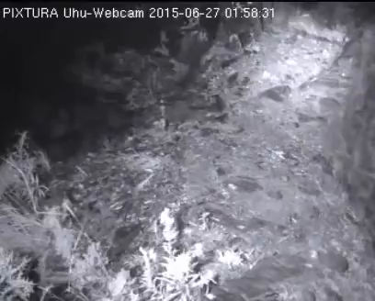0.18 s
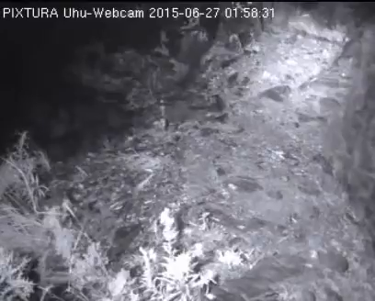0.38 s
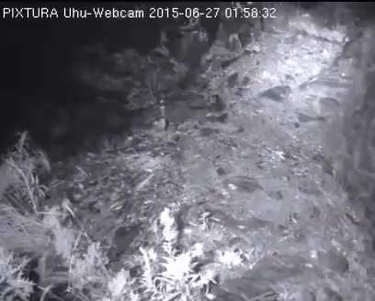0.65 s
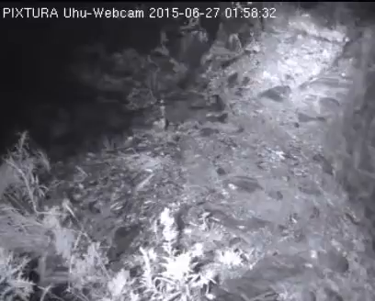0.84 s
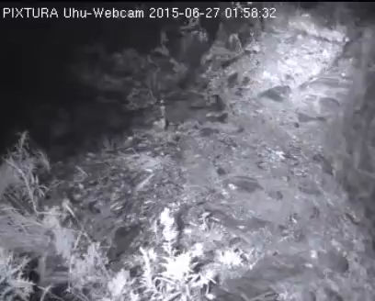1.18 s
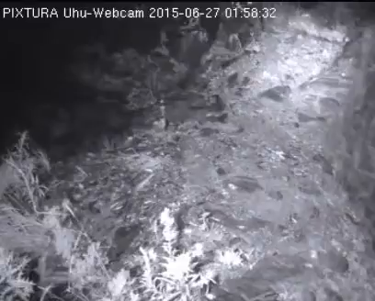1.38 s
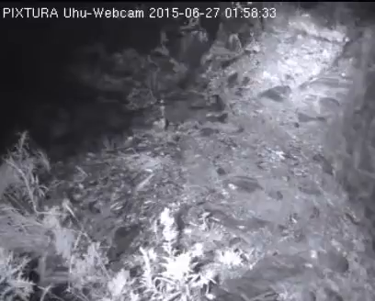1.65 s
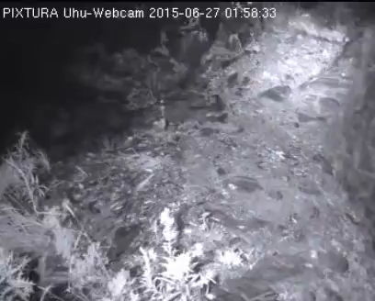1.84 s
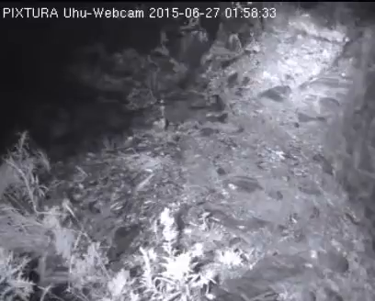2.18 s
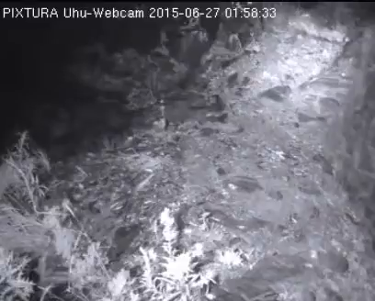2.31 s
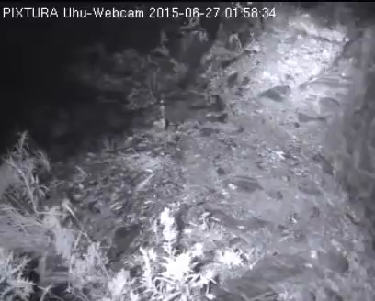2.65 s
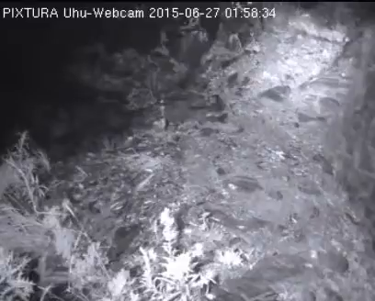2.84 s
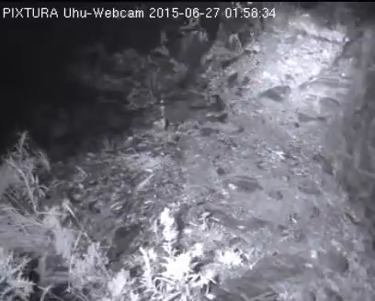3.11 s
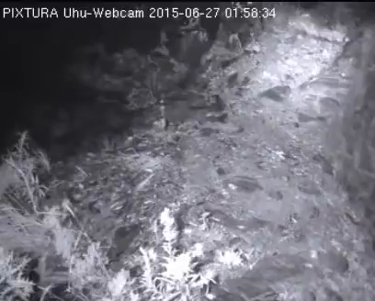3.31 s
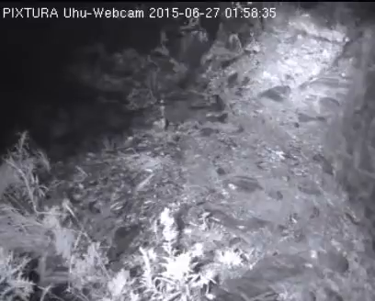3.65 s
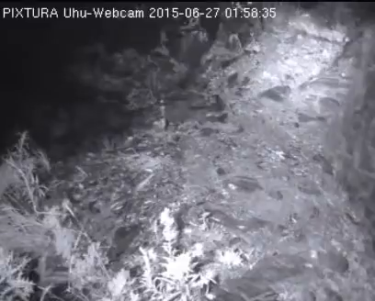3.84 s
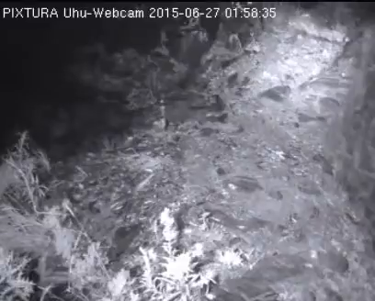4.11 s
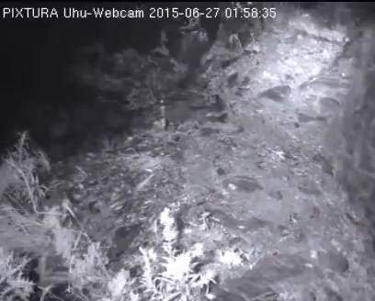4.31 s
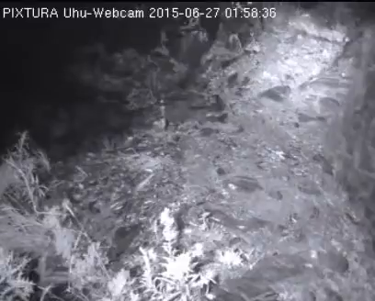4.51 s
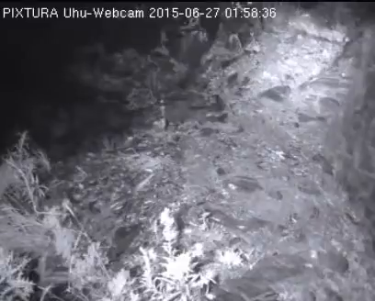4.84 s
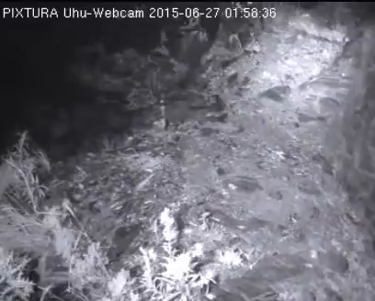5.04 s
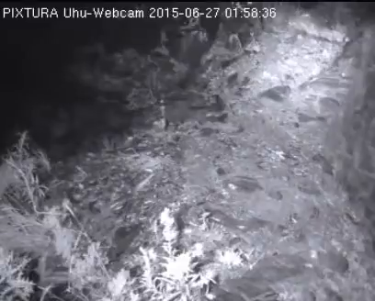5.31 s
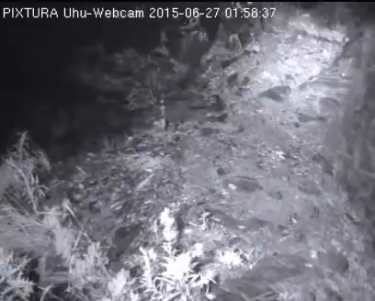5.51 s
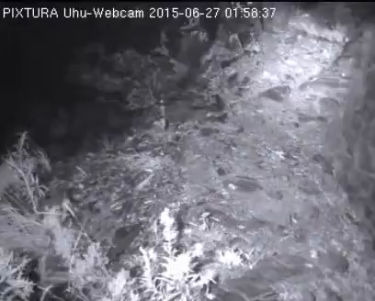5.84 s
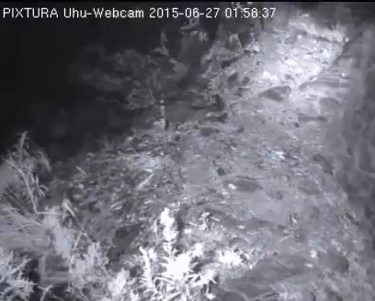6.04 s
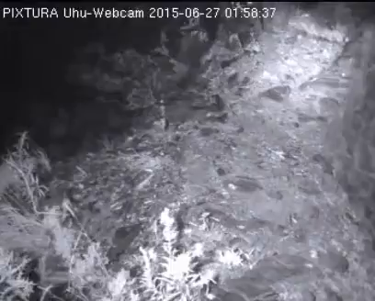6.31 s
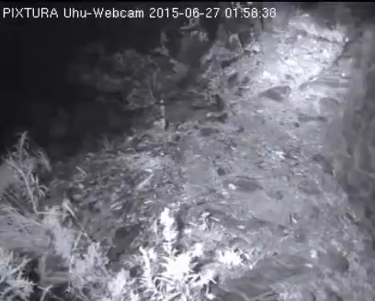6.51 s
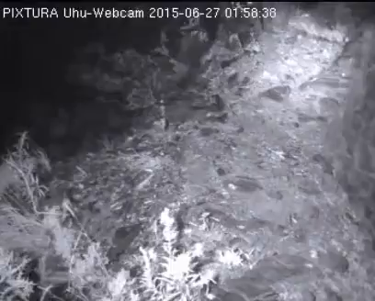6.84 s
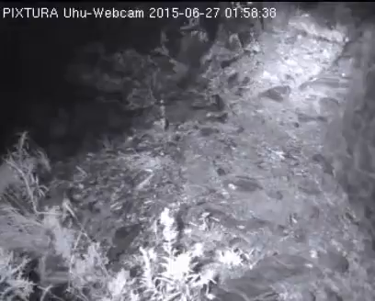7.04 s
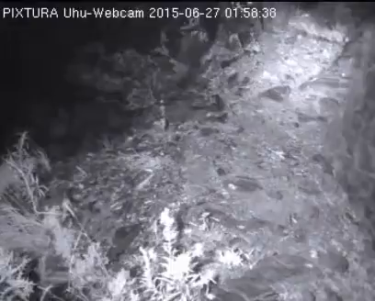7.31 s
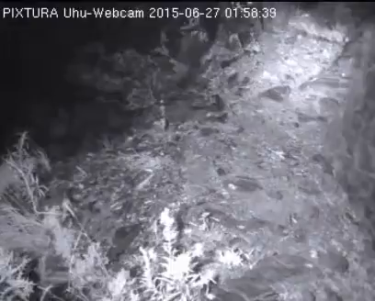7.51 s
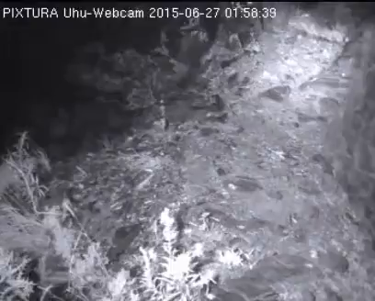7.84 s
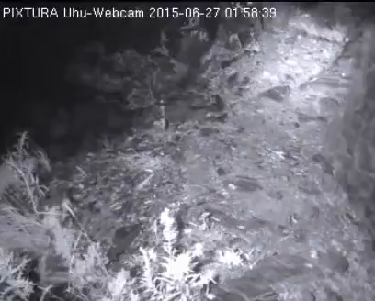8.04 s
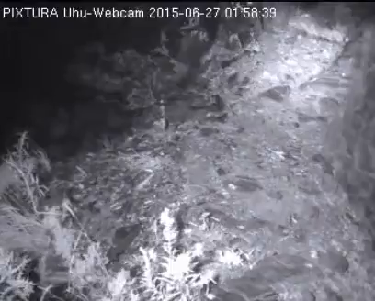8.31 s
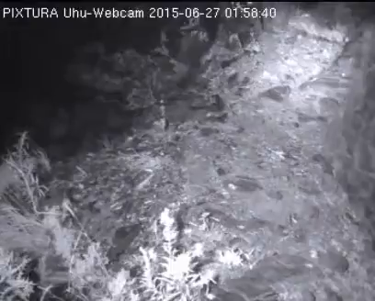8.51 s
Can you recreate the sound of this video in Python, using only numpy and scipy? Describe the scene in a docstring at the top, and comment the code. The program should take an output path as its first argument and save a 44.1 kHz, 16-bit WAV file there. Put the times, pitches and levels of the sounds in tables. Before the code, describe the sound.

A quiet night outdoors on a rocky ledge, heard in mono through a narrow, dull camera microphone. A steady, barely swaying hiss and a low electrical hum continue throughout. At about 2.5 seconds a young owl gives a hoarse, breathy rasp, swelling quickly and dying away within roughly a third of a second, with thin whistles and an unsteady, rough voice around two to four kilohertz. Near rock colours it and a faint tail returns from far slopes. At 3.8 seconds a similar, slightly softer rasp rises and ends near 4.0 in a tiny falling squeak. Only hiss and hum follow, apart from a small dry tick at 5.6. At 7.6 seconds comes the third rasp, much louder, harsher and airier, its peaks slightly clipped, stopping quickly with a very faint downward squeak near 7.9. The hiss and hum then carry on to the end, about 8.6 seconds.

```python
"""Young eagle owls begging at night

Three short hoarse rasps from a rock ledge, the last the loudest; faint squeaks trail the second and third.
Each call is breath noise coloured by a half-open throat, with narrow whistles and a thin unsteady voice.
Near rock returns quick reflections and far slopes a faint tail; one small dry tick falls between the calls.
A narrow camera microphone adds mains hum and hiss and passes little treble; later the loudest call is clipped.
"""
import sys
import numpy as np
from scipy import signal
from scipy.fft import rfft, irfft
from scipy.io import wavfile

SR = 44100
rng = np.random.default_rng(int(sys.argv[2]) if len(sys.argv) > 2 else 0)


def generate_wav(signal):
    """Clip the signal to [-1, 1] and save it as 16-bit WAV at the path in sys.argv[1]."""
    frames = np.transpose(np.atleast_2d(signal))
    scaled = np.clip(frames, -1, 1) * 32767
    pcm = np.round(scaled).astype(np.int16)
    wavfile.write(sys.argv[1], SR, pcm)


N = 382788
TIME = np.arange(N) / SR
FREQS = np.maximum(np.arange(N // 2 + 1) * SR / N, 1)

# begging calls: (start [s], hold [s], crescendo in the hold [dB/s], release [dB/s], level [dB],
# pitch at mid-hold [Hz], pitch rise in the hold [Hz/s], voice [dB], whistles [dB], far echo [dB]);
# voice and whistles are relative to the rasp, the echo to the call before the slopes thin and dull it
BEG_CALLS = [(2.457, 0.061, 12, 187, -18, 1035, -60.5, -7.5, 0, -13),
             (3.794, .038, 64, 187, -20, 977, 1500, -7.5, 2, -26),
             (7.638, .064, -13, 304, -10, 1033, 119.5, -14.5, 0, -26.5)]
# broad throat colour, one list per call: (frequency [Hz], gain [dB])
THROAT_COLOURS = [
    [(710, -64), (1200, -25), (1430, -16), (1990, -10), (2050, -11.5), (2370, 3.5), (2580, -2), (2850, 0),
     (3460, -4.5), (3790, -3.5), (4350, -13), (7500, -31), (9750, -57), (16500, -120)],
    [(700, -51), (1200, -22), (1620, -17.5), (1850, -3.5), (2250, 1), (2700, 0.5), (3150, 3), (3650, -2.5),
     (4250, -4.5), (4600, -11.5), (5200, -13), (6000, -24), (7500, -26), (9500, -56)],
    [(710, -60), (1200, -33), (1330, -21), (1800, -9.5), (2220, -16), (2450, -2), (2970, -2.5), (3700, 0.5),
     (4660, -13.5), (5310, -12), (6580, -24.5), (7500, -23), (9750, -54), (16500, -120)],
]
# narrow whistling resonances, one list per call: (frequency [Hz], pitch wander [Hz], relative level [dB])
WHISTLE_RESONANCES = [
    [(2110, 20, -8), (2200, 30, -2.5), (2300, 29, -0.5), (2470, 24.4, -5), (2786, 25, 0.5), (3090, 50, -3),
     (3670, 21, 0), (4770, 80, -11.5)],
    [(2210, 32, 1.5), (3060, 36, -12), (3330, 43, -14)],
    [(2443, 60, -3), (2717, 46.5, -8.5), (3180, 49.7, -6), (3446, 35.2, 5.5), (3710, 69.4, 0.5),
     (3820, 60, 0.5), (4060, 54, -6), (4220, 60, -8.5), (5160, 25, -12), (5440, 23, -21)],
]
# faint falling squeaks as a call dies: (middle [s], pitch there [Hz], peak envelope level [dB])
DYING_SQUEAKS = [(4.028, 2500, -34.5), (7.878, 1950, -38)]
# small tick on the ledge: (time [s], starting level [dB])
LEDGE_TICKS = [(5.616, -28)]
# mains hum: (frequency [Hz], rms level [dB])
MAINS_HUM = [(50, -45.5), (150, -33.5), (250, -52.5), (350, -51), (650, -53.5)]
# spectrum of the steady hiss: (frequency [Hz], relative density [dB])
HISS_COLOUR = [(25, -39), (40, -22), (60, -5.5), (76, -2.5), (95, 1), (125, -7), (170, -1), (270, -4),
               (400, 1.5), (1000, -3), (1500, -3.5), (2100, -5.5), (3800, -10), (7500, -12)]
# faint narrow bands in the hiss: (frequency [Hz], width [Hz], rms level [dB])
HISS_BANDS = [(63.1, 2.2, -53.5), (171.6, 5.6, -50), (1842, 76, -49.5), (1004, 81, -50)]
# treble of the camera's microphone channel: (frequency [Hz], gain [dB])
MICROPHONE_TREBLE = [(7300, 0.5), (8000, -7), (8600, -14), (9100, -24), (9800, -61.5)]
# treble after the later clipping: (frequency [Hz], gain [dB])
FINISHED_TREBLE = [(7500, 0.5), (10900, -7), (11900, -18.5), (15000, -10)]

ATTACK_S = 0.0813  # every call swells in the same time
VOICE_LAG_S = 0.006  # the voice catches a moment after the air starts to flow
# as the push weakens, the pitch sags and the voice loses this much more than the rasp
SAG_HZ_PER_DB, VOICE_EXTRA_DB_PER_DB = 0.85, 1.8
FUNDAMENTAL_DB = -4.5  # the voice's fundamental against its octave
SQUEAK_FALL_OCTAVES_PER_S, SQUEAK_HALF_S = 27, 0.03  # half: from the middle to silence
TOP_HZ = 15650  # upper edge of the finished sound


def owls():
    """The calls, each with its own pattern of ledge reflections and its own amount of far echo."""
    out = 0
    for row, throat, resonances in zip(BEG_CALLS, THROAT_COLOURS, WHISTLE_RESONANCES):
        start, hold, crescendo, release, level_db, pitch_hz, rise, voice_db, whistle_db, echo_db = row
        close = undb(level_db) * call(start, hold, crescendo, release, pitch_hz, rise,
                                      voice_db, whistle_db, throat, resonances)
        out = out + ledge(close) + undb(echo_db) * valley(close)
    return out


def call(start, hold, crescendo, release, pitch_hz, rise_hz_per_s, voice_db, whistle_db,
         throat, resonances, locking=0.36, bending=0.55):
    """One begging call: a single push of air drives rasp, whistles and voice."""
    effort_db = push(start, hold, crescendo, release)
    late_effort_db = push(start + VOICE_LAG_S, hold - VOICE_LAG_S, crescendo, release)
    voicing_db = VOICE_EXTRA_DB_PER_DB * late_effort_db
    hz = pitch_hz + rise_hz_per_s * held(start, hold) + SAG_HZ_PER_DB * effort_db
    # the whistles weaken with the voice, so the ends of a call are plain rasp
    whistle_gain = undb(whistle_db + locking * voicing_db)
    whistles = whistle_gain * whistle(resonances, (hz / pitch_hz) ** bending)
    voiced = undb(voice_db + voicing_db) * voice(hz)
    return undb(effort_db) * (rasp(throat) + whistles + voiced)


def push(start, hold, crescendo_db_per_s, release_db_per_s):
    """Effort of one call in dB against the middle of its hold: it swells, holds and dies away."""
    swell = np.sin(np.pi / 2 * np.clip((TIME - start) / ATTACK_S, 0, 1)) ** 2
    swell_db = 20 * np.log10(swell + 1e-9)
    dying_s = np.maximum(TIME - start - ATTACK_S - hold, 0)
    effort_db = swell_db + crescendo_db_per_s * held(start, hold) - release_db_per_s * dying_s
    return np.maximum(effort_db, -120)


def held(start, hold):
    """Seconds from the middle of a call's hold; stands still before and after it."""
    return np.clip(TIME - start - ATTACK_S, 0, hold) - hold / 2


def rasp(throat):
    """Turbulent breath, a plain noise coloured by the throat."""
    return unit(shape(noise(), colour(throat)))


def whistle(resonances, bend, shiver_hz=150, shiver_db=2.0):
    """Air jets lock loosely onto narrow resonances, bend with the voice and shiver in pitch and strength."""
    out = 0
    for hz, width, db in resonances:
        strength = undb(db + shiver_db * wander(shiver_hz))
        moving_hz = hz * bend + width * wander(shiver_hz)
        out = out + strength * np.sin(sine_phase(moving_hz))
    return unit(out)


def voice(pitch_hz, jitter=0.0197, jitter_hz=260, shimmer_db=3.0):
    """A hoarse tone, unsteady in pitch and strength, whose octave is stronger than its fundamental."""
    phase = sine_phase(pitch_hz * (1 + jitter * wander(jitter_hz)))
    tone = np.sin(2 * phase) + undb(FUNDAMENTAL_DB) * np.sin(phase)
    return unit(tone * undb(shimmer_db * wander(rate_hz=160)))


def squeaks(jitter=0.078, jitter_hz=400):
    """A last wisp of air slides down in pitch as the bill closes."""
    out = 0
    for middle, pitch_hz, db in DYING_SQUEAKS:
        age = np.clip(TIME - middle, -SQUEAK_HALF_S, SQUEAK_HALF_S)
        falling_hz = pitch_hz * 2 ** (-SQUEAK_FALL_OCTAVES_PER_S * age)
        hz = falling_hz * (1 + jitter * wander(jitter_hz))
        envelope = np.cos(np.pi / 2 * age / SQUEAK_HALF_S) ** 2
        out = out + undb(db) * envelope * unit(np.sin(sine_phase(hz)))
    return out


def ledge(x, count=14, reach_s=0.016, wall_db=-7):
    """Near rock faces return a cluster of quick reflections that comb the sound."""
    response = np.zeros(N)
    lags = ((0.05 + rng.random(count)) * reach_s * SR).astype(int)
    response[lags] = rng.choice([-1, 1], count) * undb(wall_db) / np.sqrt(count)
    response[0] = 1  # the direct sound
    return shape(x, rfft(response) / np.sqrt(np.sum(response ** 2)))


def valley(x, t60=1.4, build_s=0.04, thin_hz=2000, dull_hz=5000):
    """Far slopes scatter a faint tail, thinner and duller than the call."""
    response = noise() * undb(-60 * TIME / t60) * (1 - np.exp(-TIME / build_s))
    band = 1 / (1 + (thin_hz / FREQS) ** 4) / (1 + (FREQS / dull_hz) ** 4)
    return shape(x, rfft(response) / np.sqrt(np.sum(response ** 2)) * band)


def ticks(decay_s=0.007, centre_hz=1000, width_hz=3000):
    """A brief dry tick, as of a bit of grit: broad noise that starts at once and dies away."""
    blow = 0
    for start, db in LEDGE_TICKS:
        blow = blow + undb(db) * (TIME >= start) * np.exp(-np.abs(TIME - start) / decay_s)
    return blow * ring(noise(), centre_hz, width_hz)


def background(hiss_db=-34, sway_db=0.47):
    """Odd mains harmonics over a gently swaying hiss with a few faint bands in it."""
    hum = sum(np.sqrt(2) * undb(db) * np.sin(2 * np.pi * (hz * TIME + rng.random()))
              for hz, db in MAINS_HUM)
    hiss = unit(shape(noise(), colour(HISS_COLOUR) * (FREQS < SR / 4)))
    swaying_hiss = hiss * undb(hiss_db + sway_db * wander(rate_hz=4.0))
    bands = sum(undb(db) * ring(noise(), hz, width) for hz, width, db in HISS_BANDS)
    return hum + swaying_hiss + bands


def undb(db):
    """Decibels to gain."""
    return 10 ** (np.asarray(db) / 20)


def unit(x):
    """Scale to rms 1."""
    return x / np.sqrt(np.mean(x ** 2))


def shape(x, gain):
    """Filter by a gain for each frequency."""
    return irfft(rfft(x, N) * gain, N)


def colour(points):
    """Gain for each frequency from (frequency [Hz], gain [dB]) points."""
    hz, db = np.transpose(points)
    return undb(np.interp(np.log(FREQS), np.log(hz), db))


def noise():
    """White noise."""
    return rng.standard_normal(N)


def wander(rate_hz):
    """Smooth random motion of spread 1."""
    return unit(shape(noise(), np.exp(-(FREQS / rate_hz) ** 2)))


def ring(x, hz, width):
    """A steep resonance, rms 1."""
    return unit(shape(x, 1 / (1 + 1j * (FREQS - hz) / width) ** 2))


def sine_phase(hz):
    """Running phase of a moving pitch."""
    return 2 * np.pi * np.cumsum(hz) / SR


def scene():
    """Owls with their squeaks, a tick and the steady background, in mono."""
    return (owls() + squeaks() + ticks() + background())[None]


def record(dry, ceiling=0.64, knee=8):
    """The camera's narrow band, then later clipping of the loudest peaks and a dulled, cut-off top."""
    narrow = shape(dry[0], colour(MICROPHONE_TREBLE))
    clipped = narrow / (1 + np.abs(narrow / ceiling) ** (2 * knee)) ** (0.5 / knee)
    dulled = shape(clipped, colour(FINISHED_TREBLE))
    top_cut = signal.ellip(8, 0.2, 70, TOP_HZ, fs=SR, output="sos")
    return signal.sosfilt(top_cut, dulled)[None]


dry = scene()
out = record(dry)
generate_wav(out)
```